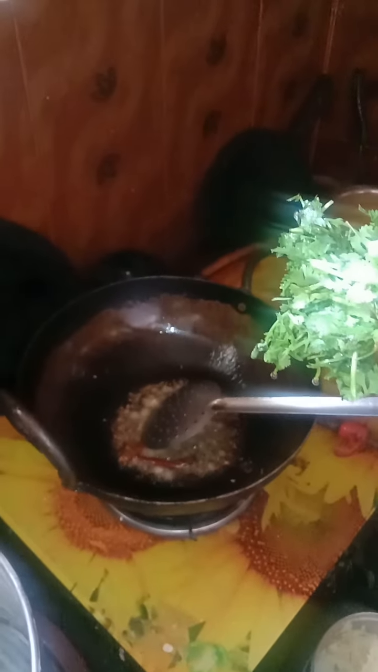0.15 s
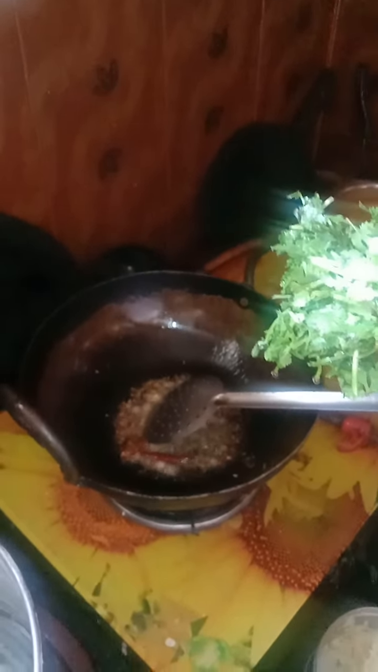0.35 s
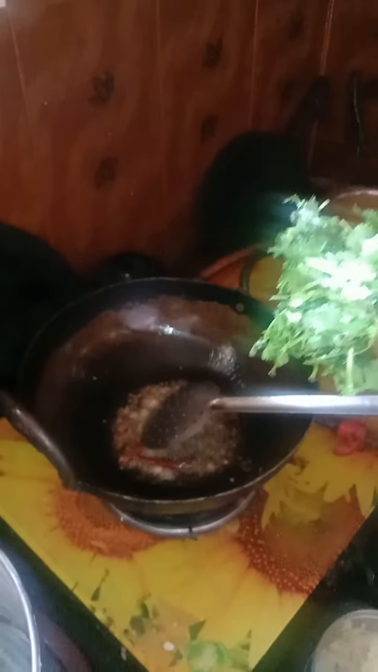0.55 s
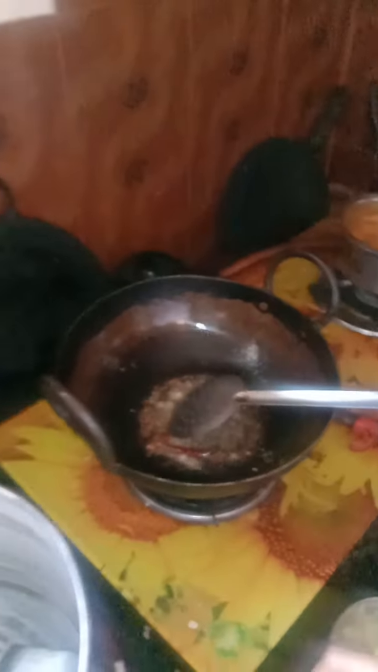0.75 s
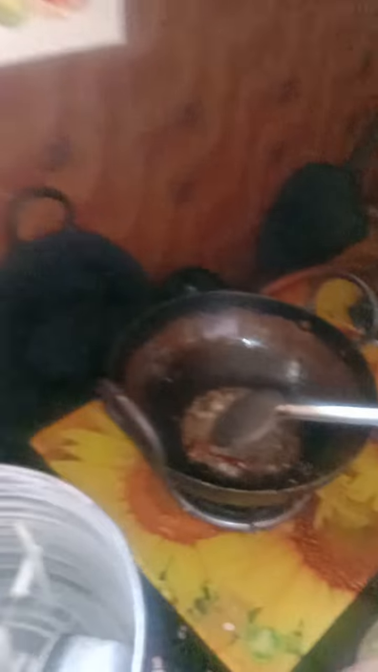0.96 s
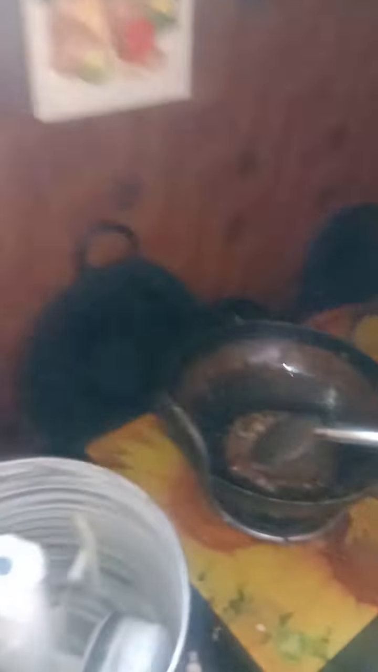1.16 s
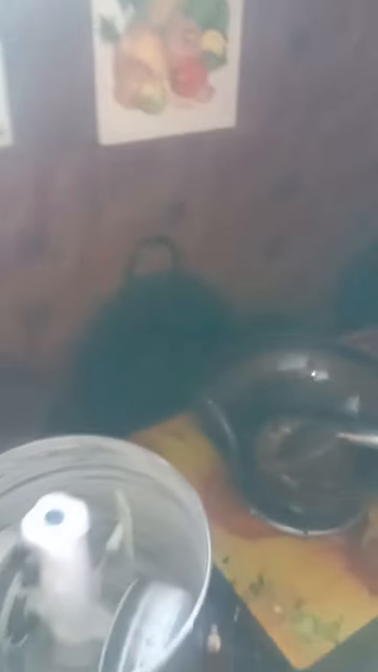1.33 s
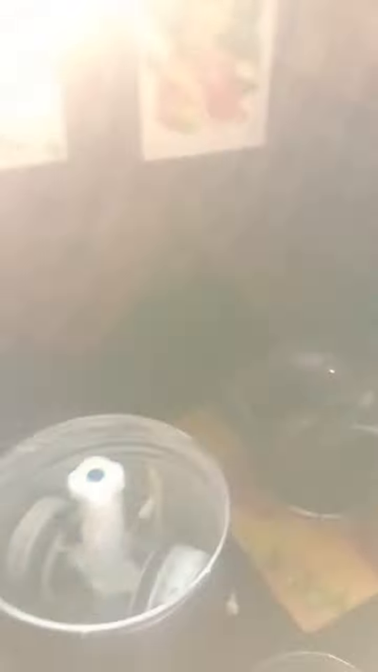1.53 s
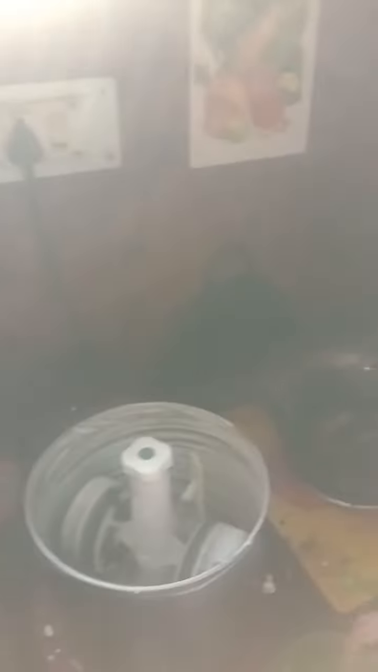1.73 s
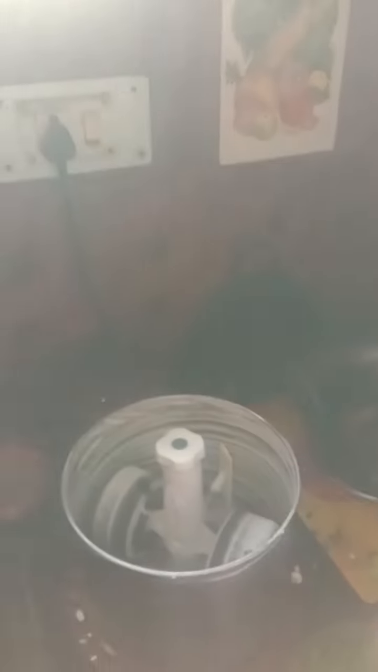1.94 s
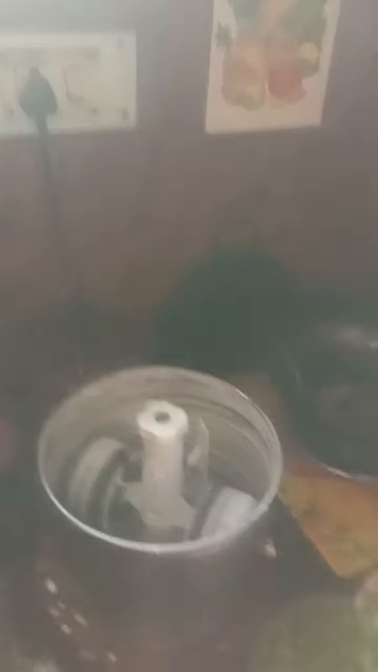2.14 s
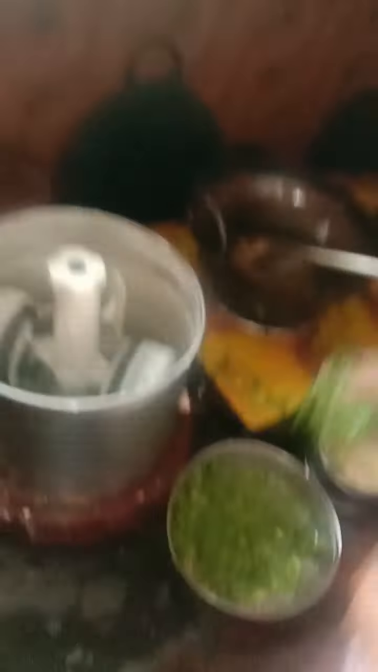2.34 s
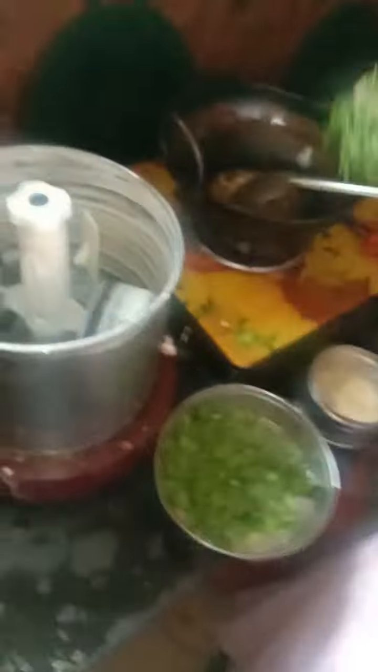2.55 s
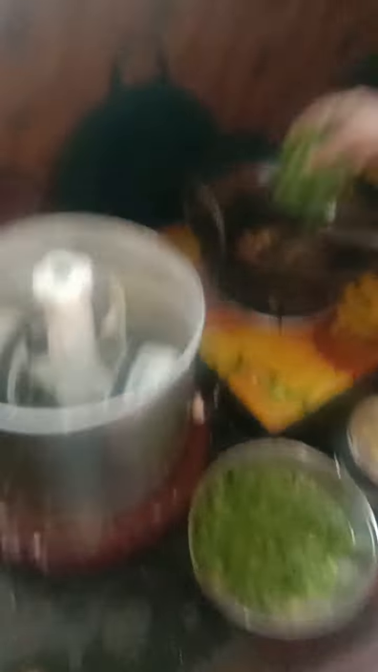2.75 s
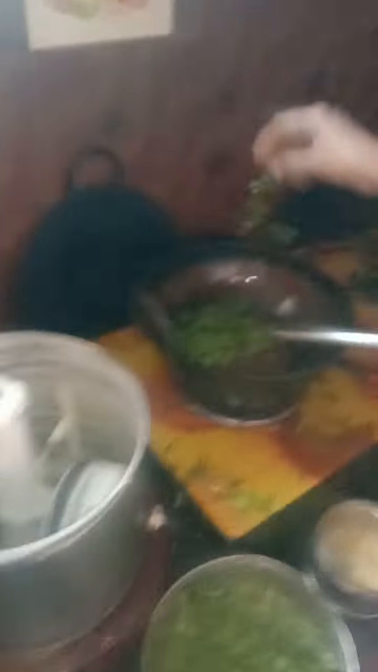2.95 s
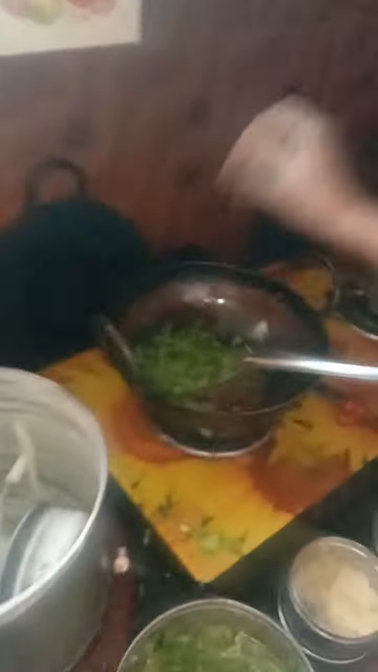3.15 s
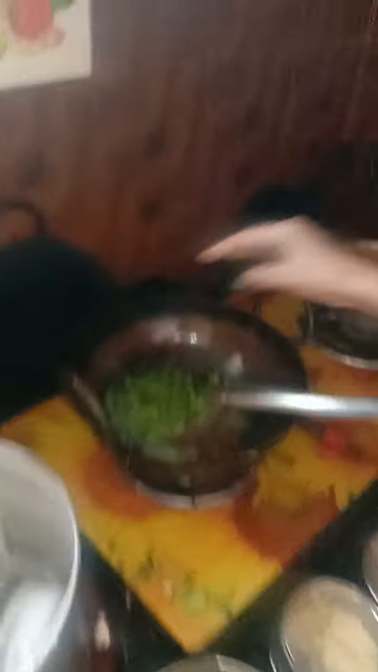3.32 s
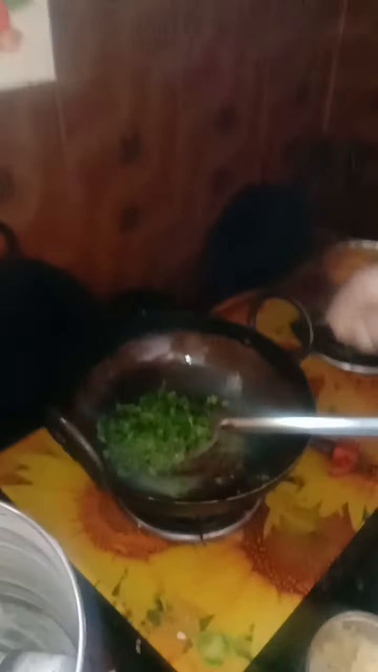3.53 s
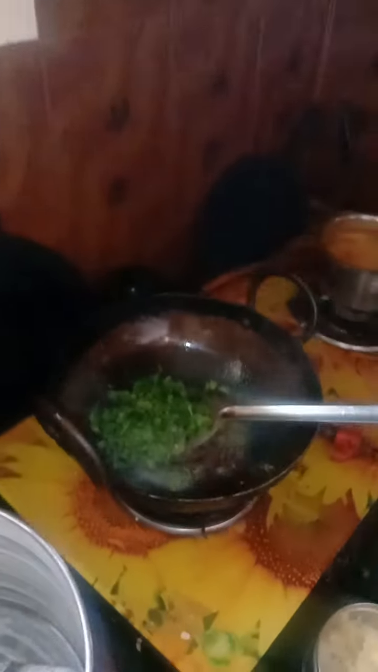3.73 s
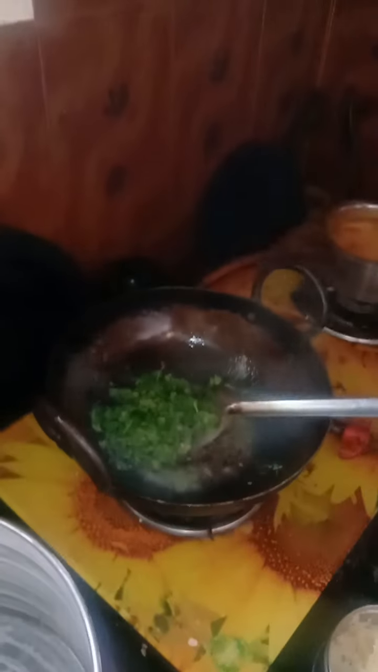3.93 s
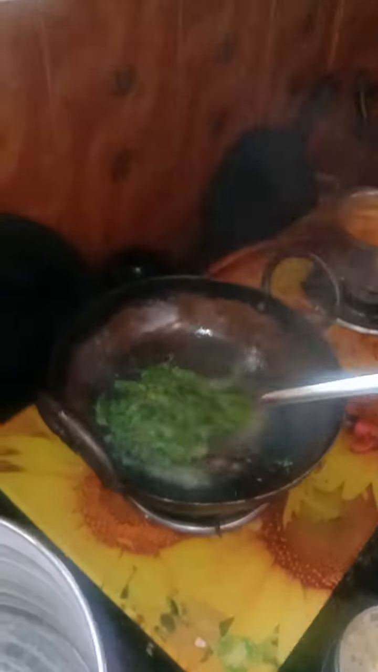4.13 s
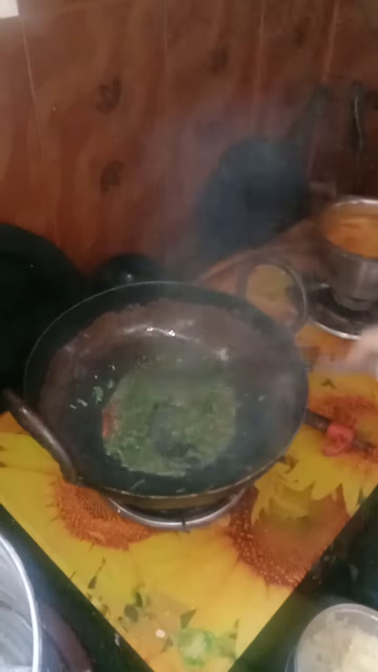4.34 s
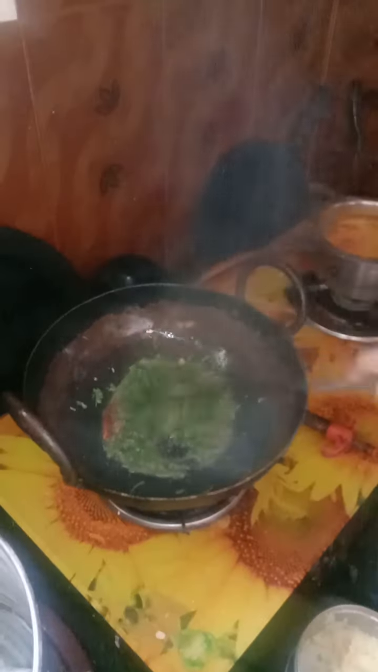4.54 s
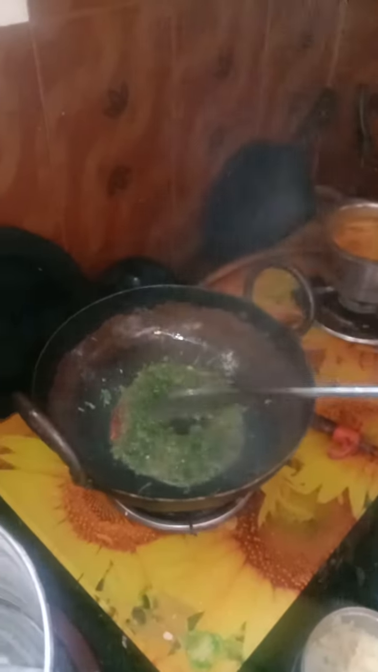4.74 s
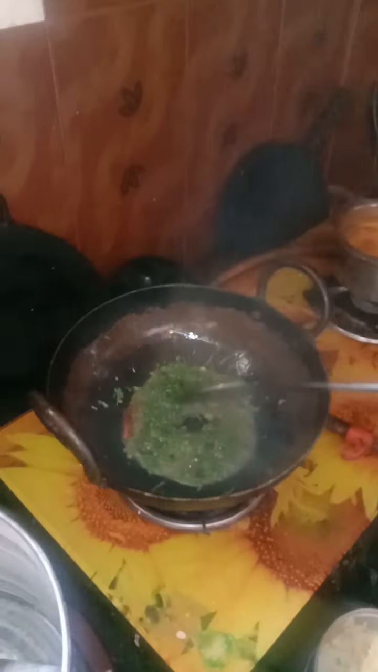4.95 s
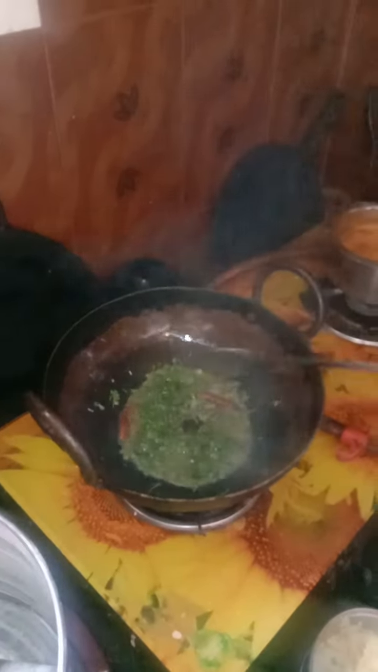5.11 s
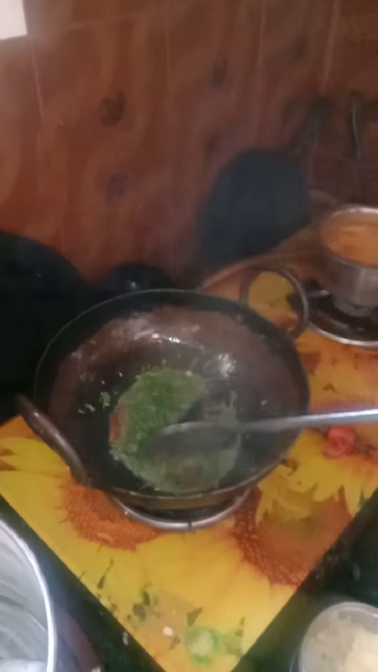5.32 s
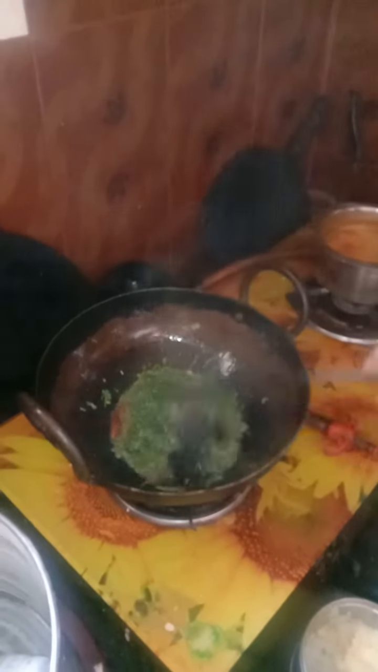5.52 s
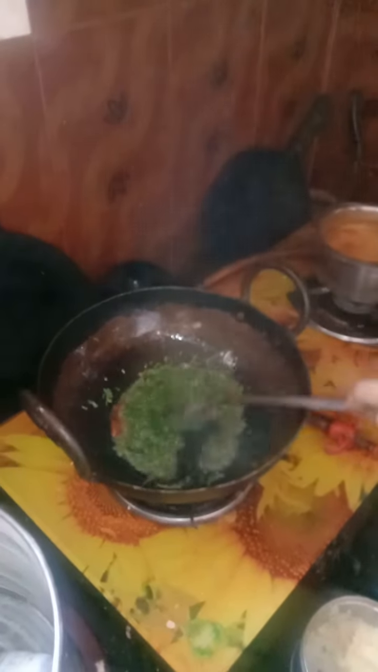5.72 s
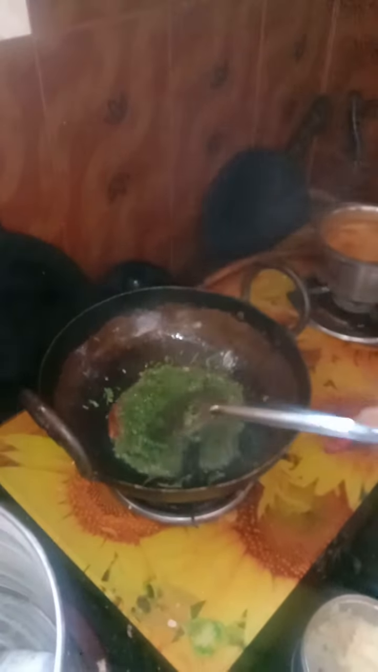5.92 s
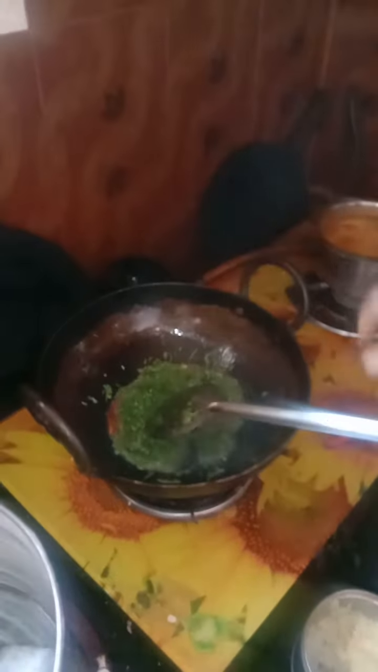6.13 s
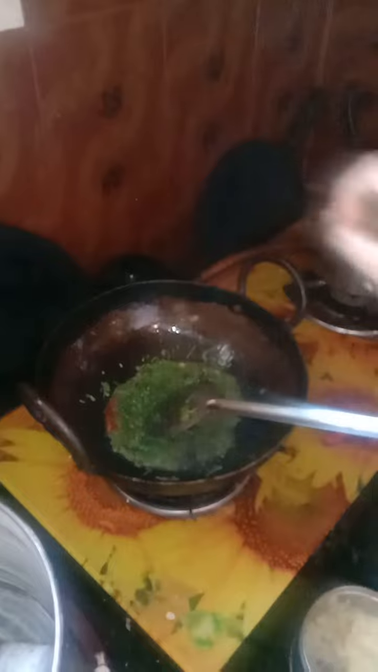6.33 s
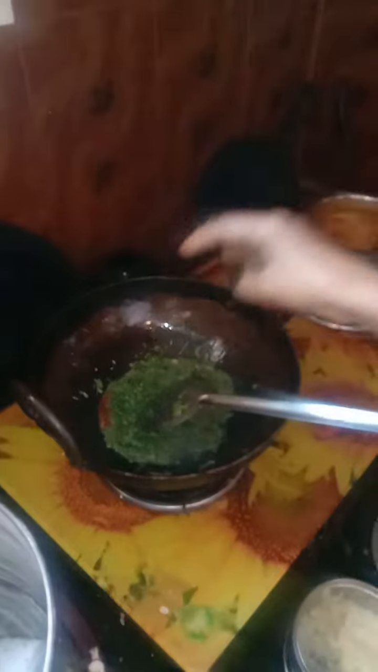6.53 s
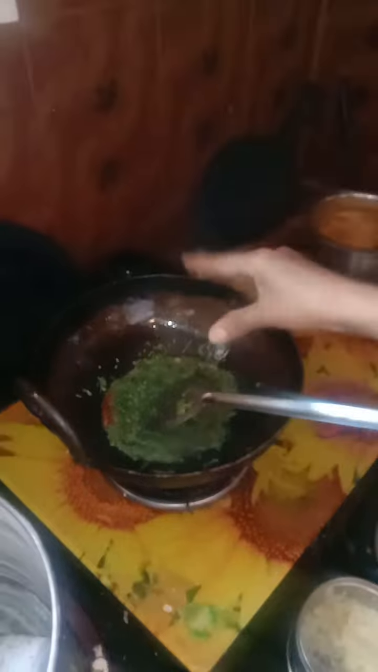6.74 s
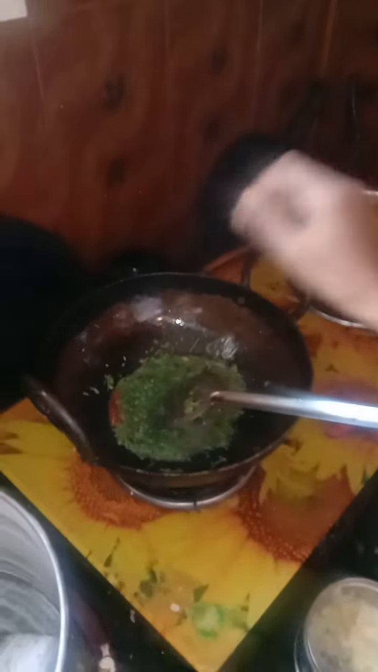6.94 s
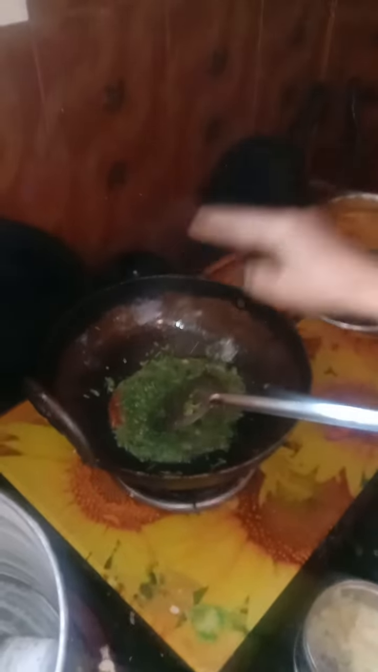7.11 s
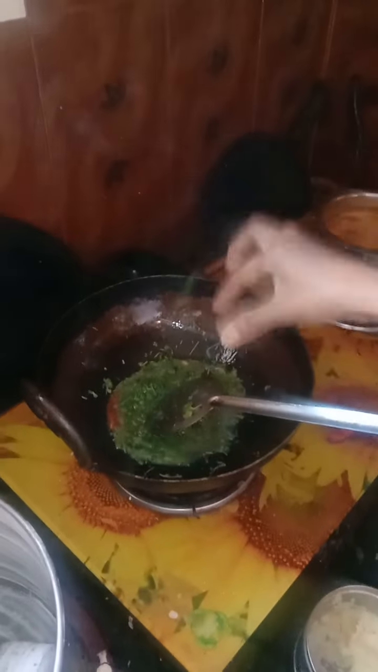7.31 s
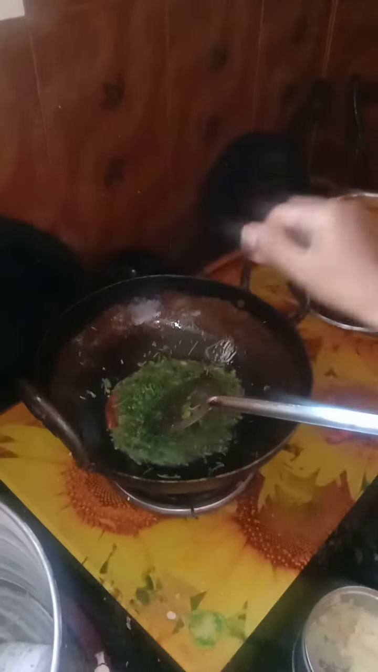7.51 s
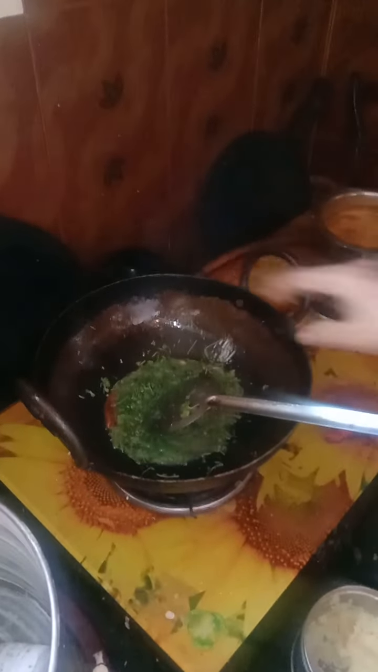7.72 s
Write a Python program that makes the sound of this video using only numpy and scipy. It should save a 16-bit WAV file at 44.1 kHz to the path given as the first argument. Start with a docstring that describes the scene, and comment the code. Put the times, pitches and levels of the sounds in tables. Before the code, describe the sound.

Close in a small kitchen, spices tick and sputter quietly in hot oil in an iron wok, with little pitched steam chirps and snaps. Just before three seconds wet leaves land and a loud, bright sizzle swells. A steel ladle clanks and scrapes at about four seconds, the sizzle drops, flares at later stirs and grows grainier. A faint burner hum lies below. Mono phone microphone.

```python
"""Spices and wet leaves in a hot wok

Spices tick and sputter in a little hot oil in an iron wok on a gas stove: click trains and ringing steam pockets.
A handful of wet leaves drops in: filtered click trains burst into a dense sizzle that slowly calms.
A steel ladle knocks and stirs: decaying modes, thuds and scrapes. A burner note and room noise lie beneath.
Echoes and bowl resonances colour the pan; a phone close by hears it all in mono, on two equal channels."""
import sys
import numpy as np
from scipy import signal
from scipy.io import wavfile
from scipy.ndimage import uniform_filter1d

SR = 44100
rng = np.random.default_rng(int(sys.argv[2]) if len(sys.argv) > 2 else 0)


def store_wav(level_fs):
    """Save 16-bit WAV to argv[1]."""
    pcm = np.round(np.clip(np.atleast_2d(level_fs), -1, 1) * 32767)
    wavfile.write(sys.argv[1], SR, pcm.T.astype(np.int16))


N = 342657
TIME = np.arange(N) / SR
LAND_S = 2.895  # the leaves land in the oil


def gain_of(db):
    """Amplitude ratio is ten to the power of decibels over twenty."""
    return 10 ** (np.asarray(db) / 20)


def evened(x):
    """Normalization by the root mean square, to rms 1."""
    return x / np.sqrt(np.mean(x ** 2) + 1e-20)


def read(points, hz):
    """Linear interpolation of a frequency table on a log-frequency axis."""
    table_hz, value = np.transpose(points)
    return np.interp(np.log(hz + 1), np.log(table_hz), value)


def level_curve(rows):
    """A gain curve interpolated linearly in decibels between timed levels."""
    start_s, level_db = np.transpose(rows)
    return gain_of(np.interp(TIME, start_s, level_db))


def add(mix, start_s, sound):
    """Superposition: sums a sound into the mix from a given time."""
    part = mix[round(start_s * SR):][:len(sound)]
    part += sound[:len(part)]


def colour(x, points, size=4096):
    """Minimum-phase filtering: a causal response of the given spectrum keeps the fronts of clicks sharp."""
    log_gain = np.log(gain_of(read(points, abs(np.fft.fftfreq(size, 1 / SR)))))
    # minimum phase is the negative Hilbert transform of the log gain
    taps = np.fft.ifft(np.exp(np.conj(signal.hilbert(log_gain)))).real
    return signal.oaconvolve(x, taps[:size // 2])[:len(x)]


def resonate(x, hz, width_hz):
    """A second-order resonance with gain 1 at its peak."""
    return signal.lfilter(*signal.iirpeak(hz, hz / width_hz, SR), x)


def clicks(per_s, spread_db, count=N):
    """A random impulse train: either sign, sizes exponentially distributed in decibels, scaled to rms 1."""
    size = gain_of(spread_db * np.minimum(rng.exponential(1, count), 3.3))
    sign = rng.choice([-1, 1], count)
    present = rng.random(count) < per_s / SR
    return evened(size * sign * present)


def flutter(per_s, depth_db):
    """Random amplitude modulation: Gaussian levels in decibels joined by straight lines."""
    knots = rng.standard_normal(N)
    return gain_of(depth_db * np.interp(TIME * per_s, np.arange(N), knots))


def burst(length, per_s, spread_db):
    """Exponential decay of a short impulse train; length is the time constant in seconds."""
    t = TIME[:SR // 4]
    return clicks(per_s, spread_db, count=len(t)) * np.exp(-t / length)


def drone():
    """Resonance of noise gives the burner's low, wavering note over rumble, murmur and faint hiss of the room."""
    # the burner's note: start_s, level_db
    hum_level = level_curve([(0.0, -66.5), (2.0, -63.5), (2.2, -56.5), (3.7, -58), (4.0, -64.5),
                             (7.77, -62.5)])
    # the burner's resonance: pitch_hz, width_hz
    burner = (203.3, 35)
    # spectrum of the rumble: frequency_hz, level_db
    rumble_tone = [(25, -22), (48, -29), (70, 5), (82, -5), (95, -3), (130, -10), (200, -15), (1000, -43),
                   (16000, -72)]
    # spectrum of the murmur and hiss: frequency_hz, level_db
    room_tone = [(100, -23), (180, -19), (290, 4), (350, -2.5), (440, 0), (600, -11), (1000, -21),
                 (3000, -21), (16000, -7.5)]
    rumble_db, murmur_db = -71.5, -58.5
    murmur_share = 0.33  # how far the murmur follows the note's level

    note = resonate(resonate(rng.standard_normal(N), *burner), *burner)
    note = evened(note * flutter(15, depth_db=3.5))
    rumble = evened(colour(rng.standard_normal(N), rumble_tone) * flutter(9, depth_db=6.0))
    murmur = evened(colour(rng.standard_normal(N), room_tone) * flutter(13, depth_db=3.5))
    murmur_level = gain_of(murmur_db) * (hum_level / hum_level.min()) ** murmur_share
    return hum_level * note + gain_of(rumble_db) * rumble + murmur_level * murmur


def sputter(hz, length):
    """Impulse excitation of a resonator: a first snap and an uneven train of bubbles ring a small steam pocket."""
    edge = 0.7  # lower band edge over pitch
    sharpness, ring_db = 9.2, -0.5
    train = burst(length, per_s=1900, spread_db=2.0)
    train *= 1 - np.exp(-TIME[:len(train)] / 0.0016)
    train[0] += 5  # the first snap
    band = signal.butter(3, [hz * edge, hz / edge], "bandpass", fs=SR, output="sos")
    body = signal.sosfilt(band, train)
    ring = resonate(body, hz, hz / sharpness)
    # higher pockets are quieter
    return np.sqrt(3000 / hz) * (gain_of(-12.0) * body + gain_of(ring_db) * ring)


def spices():
    """Clustered impulse noise makes fine ticks; small steam pockets resonate, each at a pitch of its own."""
    # spices simmering: start_s, level_db
    simmer = [(0.0, -40), (.73, -44), (1.56, -43), (1.97, -47), (2.35, -42.5), (2.65, -47), (2.9, -45)]
    # spectrum of the ticks: frequency_hz, level_db
    simmer_tone = [(100, -50), (450, -19), (700, -17), (1000, -11.5), (1700, -8), (2300, 1.5), (4000, 1.5),
                   (6000, 2), (9500, -4.5), (12500, -5), (16000, -11)]
    ticks = clicks(per_s=3000, spread_db=3.0) * flutter(40, depth_db=2.0) * flutter(12, depth_db=1.7)
    ticks = evened(colour(ticks, simmer_tone))
    pockets = np.zeros(N)
    for when, size, strength, life in rng.random((200, 4)):
        hz = np.interp(size, [0, 1], [1800, 8000])
        pocket = gain_of(-14 * strength) * sputter(hz, 0.0042 + 0.017 * life)
        add(pockets, when * simmer[-1][0], pocket)
    return level_curve(simmer) * (gain_of(-1.0) * ticks + gain_of(13) * pockets)


def sputters():
    """Resonance of single steam pockets as steam sputters out of a seed."""
    out = np.zeros(N)
    # steam out of a seed: start_s, level_db, pitch_hz, decay_s
    seeds = [(0.017, -20.5, 2960, 0.028), (0.08, -20.5, 4380, .019), (0.265, -42.5, 900, .037),
             (0.283, -24, 6260, 0.033), (.383, -22, 2580, .018), (0.42, -20.5, 4800, 0.032),
             (0.535, -28, 2740, .022), (0.688, -45.5, 450, 0.091), (0.809, -29, 2800, 0.029),
             (0.882, -23.5, 3700, .032), (.9682, -24.5, 7000, .02), (1.3, -23.5, 2150, 0.019),
             (1.44, -15.5, 2920, 0.034), (1.502, -28, 5400, 0.11), (1.628, -13.5, 3100, 0.027),
             (1.757, -24.5, 3070, 0.035), (1.78, -22, 2450, 0.026), (1.857, -17, 2930, 0.023),
             (2.274, -24, 2540, 0.026), (2.423, -17.5, 2780, .022), (2.456, -19, 2820, 0.0077),
             (2.525, -28, 2890, .031), (2.594, -27, 2650, 0.022), (2.751, -22.5, 5400, 0.048)]
    for start_s, level_db, pitch_hz, decay_s in seeds:
        add(out, start_s, gain_of(level_db) * sputter(pitch_hz, decay_s))
    return out


def pops():
    """Transient impulse noise: a bubble snaps open and its droplets fizz; the brighter, the less body it has."""
    # single bubbles bursting: start_s, snap_db, spray_db (the droplets), treble_edge_hz
    bubbles = [(.0546, -16, -35, 8150), (0.188, -21, -40.5, 8550), (0.4162, -22, -34, 7000),
               (.453, -18, -30.5, 9000), (.538, -16.5, -33, 10000), (0.813, -20, -37, 8000),
               (.845, -26, -30, 10900), (0.857, -21, -32.5, 16900), (1.017, -21, -32, 16600),
               (1.207, -26, -41, 12300), (2.098, -35, -44, 20000), (2.139, -21.5, -36, 20000),
               (4.019, -10, -30, 15000), (4.355, -5, -31, 15000), (4.532, -10, -18, 14900),
               (4.7, -4, -21, 14700), (4.886, -9, -33, 12000), (6.228, -17, -20, 10160),
               (6.542, -7, -24, 15400), (6.7533, -12, -36, 12100), (6.9962, -9.5, -28.5, 9000),
               (7.131, -15, -19.5, 14800), (7.287, -12, -25, 11900), (7.372, -13.5, -24, 17000),
               (7.426, -8, -28, 6000)]
    # spectrum of a bursting bubble: frequency_hz, level_db
    pop_tone = [(100, -34), (700, -26.5), (1500, -7.5), (2300, 0.5), (4000, 0), (6000, 1.5), (11000, 1),
                (16000, 3)]
    out = np.zeros(N)
    for start_s, snap_db, spray_db, edge_hz in bubbles:
        snap = burst(0.0011, per_s=25000, spread_db=3.0)
        spray = burst(0.031, per_s=4500, spread_db=1.0)
        pop = gain_of(snap_db) * snap + gain_of(spray_db) * spray
        # the tiniest bubbles burst between 7 and 20 kHz
        low_hz = 7000 * (edge_hz / 20000) ** 4
        pop = signal.lfilter(*signal.butter(2, low_hz, "highpass", fs=SR), pop)
        pop = signal.lfilter(*signal.butter(2, edge_hz, fs=SR), pop)
        add(out, start_s, pop)
    return colour(out, pop_tone)


def ladle():
    """Modal vibration and friction: each blow rings the wok's modes, thuds and scrapes briefly."""
    # the ladle meets the wok: start_s, ring_db, thud_db, scrape_db, scrape_pitch_hz
    knocks = [(1.535, -70, -34, -47, 1250), (1.56, -56.5, -40, -23, 1900), (4.2713, -37, -17.5, 4, 2130),
              (4.298, -47, -26.5, -15, 1780), (4.33, -42, -24, -24, 1390), (4.385, -58, -34, -32, 1400),
              (4.919, -55, -34, -12, 2550), (5.167, -52, -25, -3, 2480), (5.171, -55, -34, -15, 790),
              (5.215, -55, -32, -34, 800), (5.975, -52, -35, -8, 1900)]
    # modes of the struck wok: pitch_hz, level_db, t60_s
    modes = [(166.6, -10, 0.42), (286.7, -5, 0.21), (710, -5, 0.28), (1290, -34, .2), (1460, 6, 0.21),
             (1560, 4, 0.23), (1846, -21, .14), (2050, -5, 0.085), (2100, -14, .13), (2500, -4, 0.085),
             (5260, 0, 0.066), (5750, 2, 0.097), (7300, -8, .08)]
    # spectrum of the dull thud: frequency_hz, level_db
    thud_tone = [(40, -24), (90, -16), (130, -10), (170, 0.5), (290, -5.5), (450, -8), (600, -5.5),
                 (820, 0.5), (1100, -2.5), (3000, -8), (16000, -46)]
    out, t = np.zeros(N), TIME[:SR // 2]
    ring = sum(gain_of(db - 60 * t / t60) * np.cos(2 * np.pi * hz * t) for hz, db, t60 in modes)
    ring = ring * np.minimum(t / 0.0026, 1)  # a soft attack
    for start_s, ring_db, thud_db, scrape_db, pitch_hz in knocks:
        thud = colour(burst(0.023, per_s=5800, spread_db=-2.5), thud_tone)
        grit = burst(0.016, per_s=5000, spread_db=1.5)
        # the steel edge chatters at one pitch, with a bright rasp above it
        chatter = resonate(resonate(grit, pitch_hz, 270), pitch_hz, 1900)
        rasp = resonate(resonate(grit, 5900, 3800), 6200, 5000)
        add(out, start_s, gain_of(ring_db) * ring)
        add(out, start_s, gain_of(thud_db) * thud)
        add(out, start_s, gain_of(scrape_db) * (chatter + gain_of(-6.5) * rasp))
    return out


def hump(s, half_length):
    """A Gaussian envelope of height 1, down to 1/e at half_length from its centre."""
    return np.exp(-((TIME - s) / half_length) ** 2)


def steam(full_db, swell, drop_db, cooling_db, flare_share):
    """Boiling follows heat supply: swells as leaves heat, sinks as they dry, drops when turned, shifts at stirs."""
    # the ladle presses wet leaves onto hot iron: centre_s, half_length_s, flare_db
    stirs = [(4.206, .04, -0.5), (4.56, 0.035, 4), (4.936, 0.035, 4.5), (5.183, 0.012, 1), (5.89, 0.2, 6.5)]
    turn_s, turning_s = 4.225, 0.013  # the ladle turns the leaves over and much of the steam is gone
    age = np.maximum(TIME - LAND_S, 0)
    turned = np.clip((TIME - turn_s) / turning_s, 0, 1)
    flare_db = sum(db * hump(s, half_length) for s, half_length, db in stirs)
    level_db = full_db - drop_db * turned - cooling_db * age + flare_share * flare_db
    return (1 - np.exp(-age / swell)) * gain_of(level_db)


def leaves():
    """Flash boiling: countless tiny bubbles, larger ones beneath, a hollow note of the bowl and spits on top."""
    # each voice: full_level_db, swell_s, turn_drop_db, cooling_db_per_s, flare_share
    fine = steam(*(-11, 0.2468, 4, 2.5, 0.34))
    large = steam(*(-33, 0.26, 13, 1.5, 0.86))
    hollow = steam(*(-42, 0.5, 5, 2.24, 0.65))
    # spectrum of tiny bubbles and spits: frequency_hz, level_db
    fizz_tone = [(100, -41.5), (700, -36.5), (1500, -12.5), (2200, 1), (4000, 3), (8000, 0.5), (16000, 0.5)]
    # spectrum of larger bubbles: frequency_hz, level_db
    boil_tone = [(60, -19.5), (170, -20), (280, -10), (430, -13.5), (700, -3.5), (1000, 1), (1300, -4.5),
                 (1700, 4.5), (2200, 6.5), (4000, -29), (16000, -32)]
    # the bowl's hollow note: pitch_hz, width_hz
    hollow_peak = (1274, 91)

    fizz = clicks(per_s=16000, spread_db=2.5) * flutter(110, depth_db=1.07)
    fizz = evened(colour(fizz, fizz_tone))
    spits = evened(colour(clicks(per_s=700, spread_db=6.0), fizz_tone))
    boil = clicks(per_s=2000, spread_db=2.0) * flutter(20, depth_db=1.5)
    boil = evened(colour(boil, boil_tone))
    note = clicks(per_s=300, spread_db=3.5) * flutter(14, depth_db=0.5)
    note = evened(resonate(note, *hollow_peak))
    # spits fade more slowly than the fizz, so the sizzle grows grainier as it calms
    spit_level = gain_of(-11) * fine.max() * (fine / fine.max()) ** 0.58
    in_pan = np.clip((TIME - LAND_S) / 0.046, 0, 1)
    sizzle = fine * fizz + spit_level * spits + large * boil + hollow * note
    return in_pan * flutter(12, depth_db=0.41) * sizzle


def reflections():
    """Reverberation: dense echoes from near walls, with a decay time that depends on frequency."""
    # kitchen reverberation: frequency_hz, t60_s
    decay_times = [(200, 0.19), (1500, 0.31), (4000, 0.12), (14000, 0.23)]
    count = SR // 2
    present = (rng.random(count) < 4000 / SR) * (TIME[:count] > .002)
    taps = rng.choice([-1., 1.], count) * present
    hz, t, z = signal.stft(taps, SR, nperseg=256)
    decay = gain_of(-60 * t / read(decay_times, hz)[:, None])
    tail = signal.istft(z * decay, SR, nperseg=256)[1]
    return tail / np.linalg.norm(tail)


def kitchen(x, wet_db, count=5):
    """Convolution with room responses: bubbles burst at different spots of the wok, each with its own echoes."""
    # a random spot for every 1024 samples, with smoothed changes
    spot = rng.integers(0, count, N)[np.arange(N) // 1024]
    share = [np.sqrt(abs(uniform_filter1d(1. * (spot == k), size=512))) for k in range(count)]
    echoes = sum(signal.oaconvolve(x * part, reflections())[:N] for part in share)
    wet = gain_of(wet_db)
    return (x + wet * echoes) / np.hypot(1, wet)


def scene():
    """Superposition and cavity resonance: kitchen and bowl colour all pan sounds; the drone joins them dry."""
    # air resonances of the bowl and the corner behind it: pitch_hz, width_hz, lift_db
    cavities = [(291, 21, 5), (540, 22, 11), (699.5, 39, 11.5), (790, 44, 7.5), (1249.5, 68, 12.5)]
    pan = kitchen(spices() + sputters() + pops() + ladle() + leaves(), wet_db=-5.5)
    pan = pan + sum((gain_of(db) - 1) * resonate(pan, hz, width) for hz, width, db in cavities)
    return np.tile(pan + drone(), (2, 1))


def record(dry):
    """Linear filtering: the phone microphone's colour, then a band limit."""
    # response of the microphone: frequency_hz, level_db
    microphone = [(2500, 0.5), (3300, -1.5), (4500, -3.5), (5100, 0), (5800, 3.5), (6300, -0.5),
                  (6750, 4.5), (7350, 2), (8050, -12), (9200, -9), (11500, -14), (13800, -21), (14700, -10),
                  (15400, -12)]
    edge = signal.firwin(511, 15650, window=("kaiser", 9), fs=SR)  # low-pass edge in Hz
    return np.array([signal.oaconvolve(colour(side, microphone), edge, "same") for side in dry])


dry = scene()
out = record(dry)
store_wav(out)
```